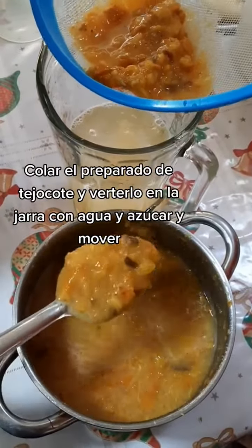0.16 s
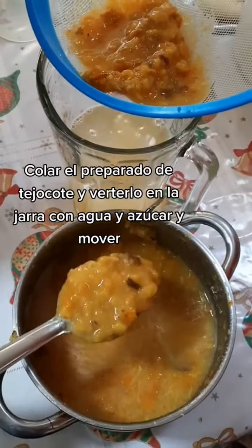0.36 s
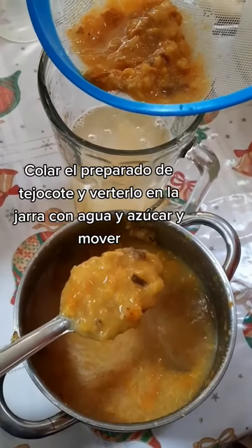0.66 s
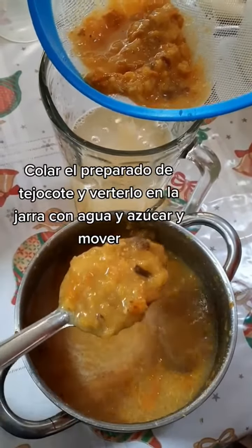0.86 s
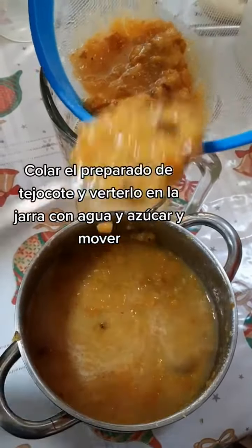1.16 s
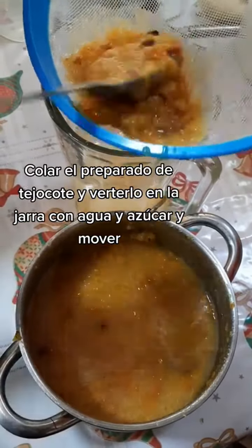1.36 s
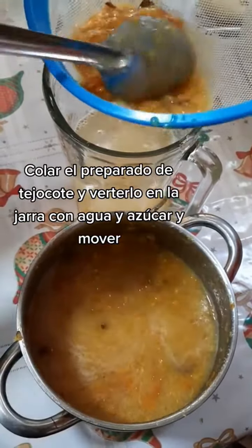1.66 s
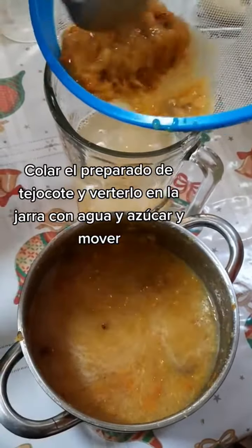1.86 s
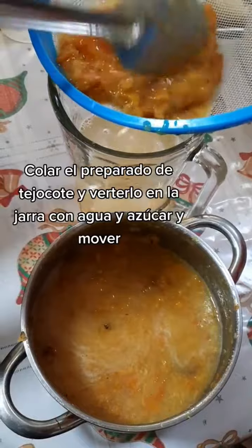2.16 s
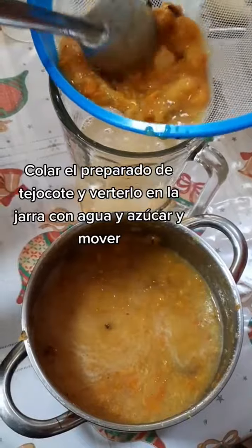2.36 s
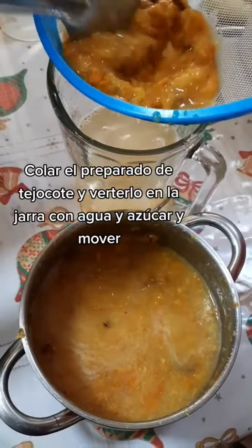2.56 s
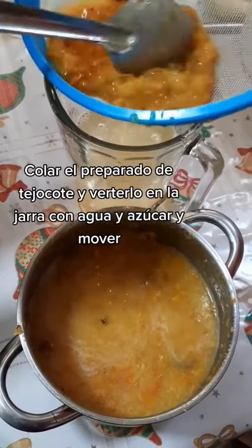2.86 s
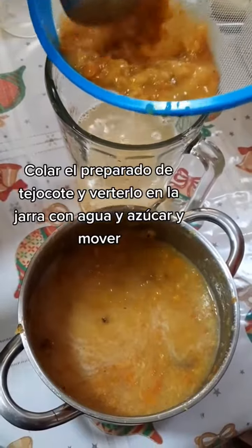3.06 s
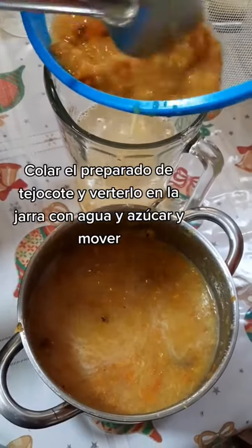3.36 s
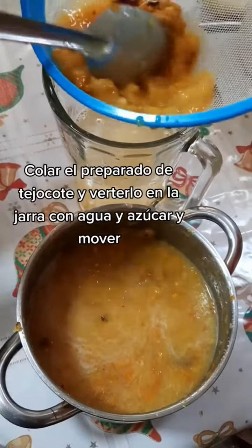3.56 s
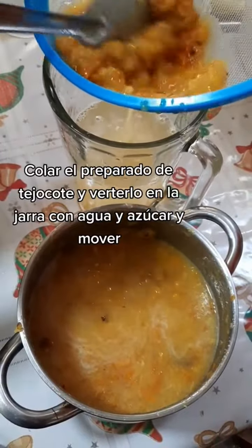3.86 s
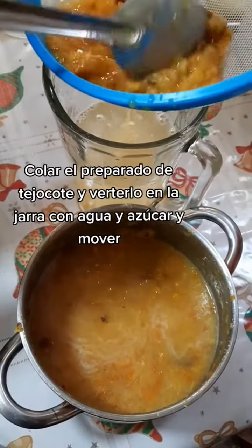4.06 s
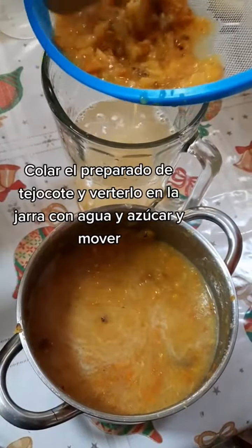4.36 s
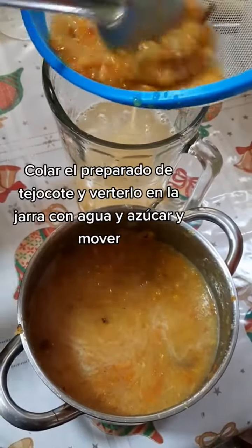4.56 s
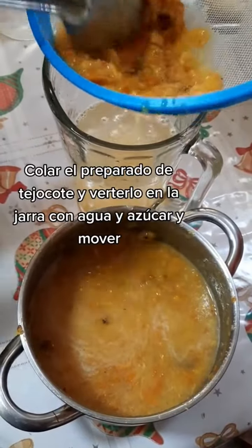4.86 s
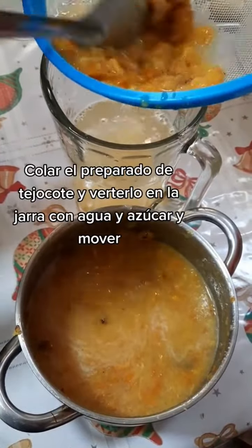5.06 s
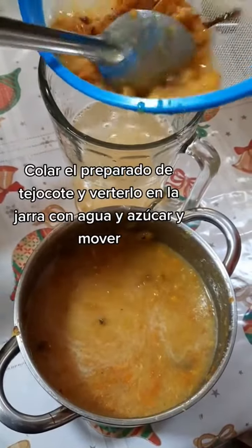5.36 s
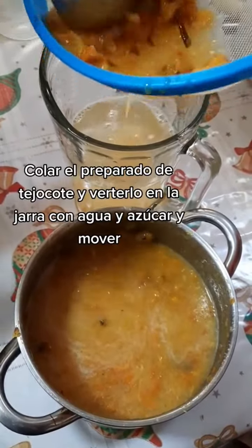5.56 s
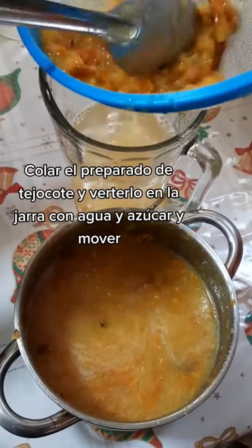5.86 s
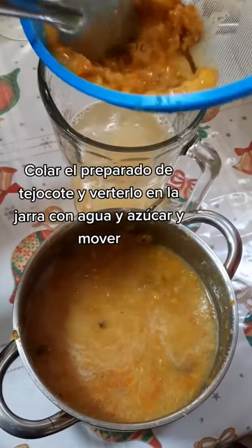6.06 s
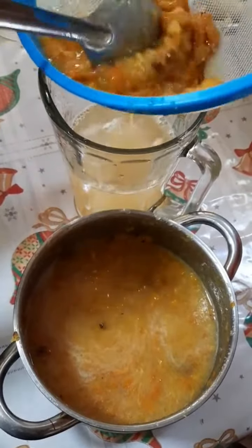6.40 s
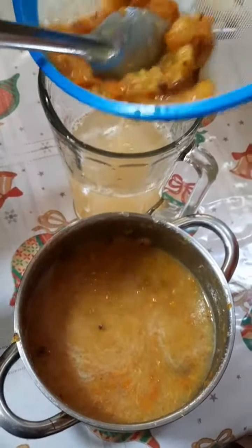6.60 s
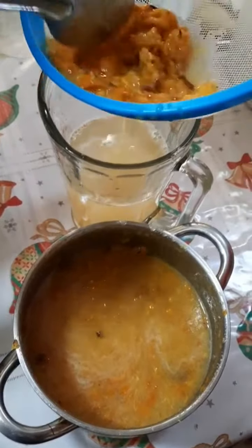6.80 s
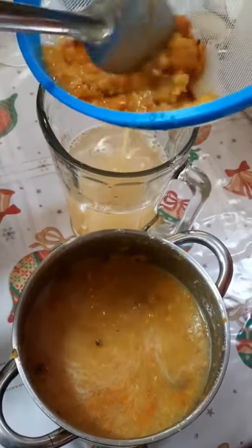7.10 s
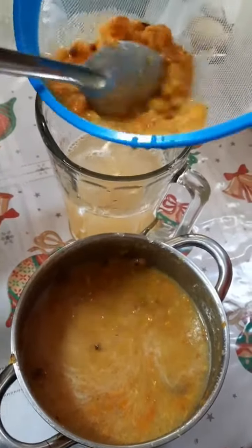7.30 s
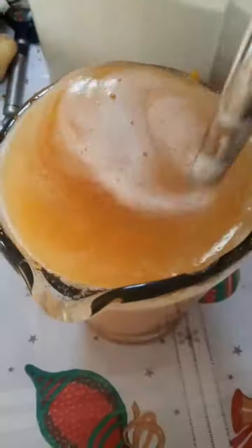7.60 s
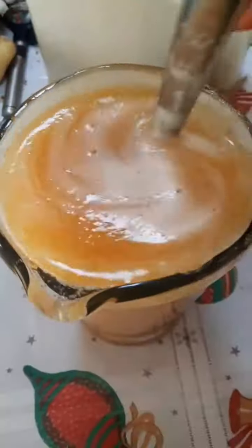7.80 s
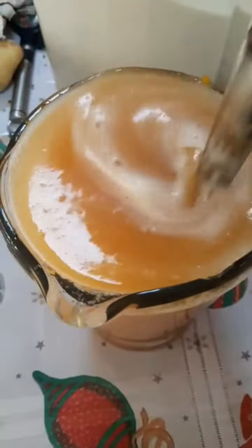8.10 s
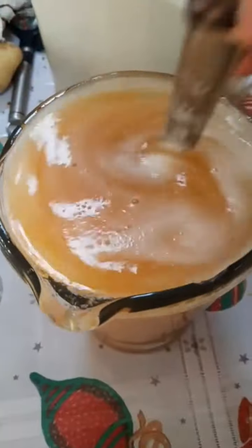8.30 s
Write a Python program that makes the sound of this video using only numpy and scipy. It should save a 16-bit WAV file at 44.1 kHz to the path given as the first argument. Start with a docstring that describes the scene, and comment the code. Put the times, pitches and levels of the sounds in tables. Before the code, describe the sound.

Soft wet pulp smacks, mesh ticks and small plopping drips in a quiet kitchen, then a dry click, sloshing liquid and a spoon clinking on glass.

```python
"""A low room rumble and faint hiss open the scene; then a spoon works fruit pulp through a sieve in a kitchen.
The pulp smacks, the mesh ticks and juice plops into a glass pitcher: sliding bubble tones and filtered noise.
After a dry click the level dips briefly, then the full pitcher is stirred: the drink laps as bubble clusters,
and the metal spoon grazes the glass with a noisy rasp, then strikes it with a crack and ringing notes."""
import sys
import numpy as np
from scipy import signal
from scipy.fft import rfft, irfft, next_fast_len
from scipy.io import wavfile

SR = 44100
rng = np.random.default_rng(int(sys.argv[2]) if len(sys.argv) > 2 else 0)


def persist_wave(psi):
    """Save psi, clipped to +-1, as 16-bit WAV."""
    counts = np.round(np.clip(psi, -1, 1) * 32767).astype(np.int16)
    wavfile.write(sys.argv[1], SR, np.atleast_2d(counts).T)


N = 372204
TIME = np.arange(N) / SR   # s
HUSH_START_S, HUSH_END_S = 7.714, 7.759   # straining ends where the hush starts

# spoon meeting the glass: start_s [s], level_db [dB]
STRIKES = [(8.2554, -20), (8.2572, -16), (8.2577, -17.5), (8.2725, -35), (8.279, -34), (8.302, -37)]


def from_db(db):
    """Turns decibels into a gain."""
    return 10 ** (np.asarray(db) / 20)


def rms_one(x):
    """Scales a sound to rms 1."""
    return x / np.sqrt(np.mean(x ** 2) + 1e-20)


def at_hz(points, hz):
    """Reads a curve on a log-frequency axis."""
    curve_hz, value = np.transpose(points)
    return np.interp(np.log(np.maximum(hz, 1)), np.log(curve_hz), value)


def colour(x, spectrum):
    """Filters noise or clicks by a spectrum in dB; rms 1."""
    count = x.shape[-1]
    size = next_fast_len(count)
    gain = from_db(at_hz(spectrum, np.fft.rfftfreq(size, 1 / SR)))
    return rms_one(irfft(rfft(x, size) * gain, size)[..., :count])


def wide_noise(spectrum):
    """Diffuse stereo noise, alike in both ears in the bass; rms about 1."""
    # likeness of the two ears: pitch_hz [Hz], left-right correlation [-1 to 1]
    likeness = [(60, 1), (150, 0.97), (300, 0.93), (600, 0.58), (1200, 0.091), (14000, 0.028)]
    size = next_fast_len(N)
    mid, side = rfft(rng.standard_normal((2, size)))
    alike = np.clip(at_hz(likeness, np.fft.rfftfreq(size, 1 / SR)), -1, 1)
    ears = np.sqrt(1 + alike) * mid + np.sqrt(1 - alike) * side * [[1], [-1]]
    return colour(irfft(ears, size), spectrum)[:, :N]


def grains(per_s, spread_db):
    """Random clicks of uneven size and either sign."""
    at = np.flatnonzero(rng.random(N) < per_s / SR)
    signs = rng.choice([-1, 1], size=N // 4)
    sizes = signs * from_db(spread_db * np.minimum(rng.exponential(1, size=N // 4), 4))
    out = np.zeros(N)
    out[at] = np.resize(sizes, len(at))
    return out


def add(track, s, sound):
    """Mixes a short sound in at time s."""
    start = round(s * SR)
    track[start:start + len(sound)] += sound[:N - start]


def fade(t60):
    """A decay by 60 dB per t60 seconds, cut off after a quarter of a second."""
    return from_db(-60 * TIME[:SR // 4] / t60)


def gate(start_s, end_s, fade_s):
    """Rises from 0 to 1 after the start and falls back to 0 by the end."""
    return np.clip(np.minimum(TIME - start_s, end_s - TIME) / fade_s, 0, 1)


def resonate(x, hz, width_hz):
    """A two-pole resonance, scaled to peak 1."""
    r = np.exp(-np.pi * width_hz / SR)
    out = signal.lfilter([1, 0, -1], [1, -2 * r * np.cos(2 * np.pi * hz / SR), r * r], x)
    return out / np.abs(out).max()


def bubble(hz, t60, rise):
    """A dying tone whose pitch slides by the share `rise`, as a trapped air pocket's does."""
    decay = fade(t60)
    slide_hz = hz * (1 + rise * (1 - decay))
    return decay * np.sin(2 * np.pi * np.cumsum(slide_hz) / SR)


def kitchen(x, wet_db, pan_db=0, first_s=0.0025):
    """Panned direct sound (positive is left) plus dense reflections that die band by band, unlike in each ear."""
    # decay of the reflections: pitch_hz [Hz], t60_s [s]
    room_decay = [(200, 0.26), (700, 0.32), (4000, 0.33), (8000, 0.25), (15000, 0.19)]
    t = TIME[:SR // 2]
    hz = np.fft.rfftfreq(len(t), 1 / SR)
    mid, side = rfft(rng.standard_normal((2, len(t))))
    walls = mid + 1.13 * side * [[1], [-1]]
    edges = np.geomspace(100, SR / 2, 9)
    tail = 0
    for low, high in zip(edges, edges[1:]):
        band = irfft(walls * (hz >= low) * (hz < high), len(t))
        tail = tail + band * from_db(-60 * t / at_hz(room_decay, np.sqrt(low * high)))
    tail = tail * np.clip(t / first_s - 1, 0, 1)   # silent until first_s, then growing in
    tail = tail / np.sqrt(np.sum(tail ** 2) / 2)
    direct = x * from_db([[pan_db / 2], [-pan_db / 2]])
    return direct + from_db(wet_db) * signal.oaconvolve(x[None], tail, axes=1)[:, :N]


def background(lumps_db=1.0, held_db=-58.5, bump_fade_s=0.067, straining_hiss_db=-68, stirring_hiss_db=-62):
    """Shaped stereo noise makes room rumble, even hiss and the soft low bumps of handling."""
    # spectrum of the room rumble: pitch_hz [Hz], level_db [dB]
    rumble_colour = [(25, -12), (70, -6), (140, -0.5), (170, -5.5), (305, -0.5), (401, -10.5), (555, -13),
                     (700, -19.5), (928, -23.5), (1010, -43.5), (1500, -36.5), (1950, -36), (3300, -120)]
    # course of the room rumble: time_s [s], level_db [dB]
    rumble_course = [(0, -56), (4.4, -54), (7.6, -51.5), (7.8, -56.5), (8.44, -55)]
    # spectrum of the hiss: pitch_hz [Hz], level_db [dB]
    hiss_colour = [(590, -23), (1000, -1), (1490, -6.5), (1730, -2.5), (2740, -5), (3600, -10.5),
                   (6190, -5), (9250, -11), (12300, -7.5), (15500, -14)]
    # spectrum of the handling: pitch_hz [Hz], level_db [dB]
    handling_colour = [(25, -21), (45, 13), (70, 15.5), (110, 6), (220, -37)]
    # soft low bumps: start_s [s], length_s [s], level_db [dB]
    bumps = [(1.514, 0.29, -53.5), (2.848, 0.3, -51), (3.184, 0.66, -50.5), (4.034, 0.4, -55.5),
             (4.793, 0.35, -54), (8.117, .28, -55)]
    rumble = from_db(np.interp(TIME, *np.transpose(rumble_course)))
    straining = TIME < HUSH_START_S
    hiss = from_db(np.where(straining, straining_hiss_db, stirring_hiss_db))
    handling = from_db(held_db) * straining   # light unsteadiness under the bumps
    for s, length, db in bumps:
        handling = np.maximum(handling, from_db(db) * gate(s, s + length, bump_fade_s))
    lumps = np.interp(TIME, np.linspace(0, TIME[-1], num=90), rng.standard_normal(size=90))
    handling = handling * from_db(lumps_db * lumps)
    low_end = rumble * wide_noise(rumble_colour)
    return low_end + hiss * wide_noise(hiss_colour) + handling * wide_noise(handling_colour)


def whine(waver=0.00795):
    """A faint thin tone and its octave swell and fade, never quite steady in pitch."""
    # spells of the tone: start_s [s], end_s [s], level_db [dB], pitch_hz [Hz]
    spells = [(1.95, 2.56, -75, 892), (2.446, 2.92, -73.5, 872)]
    wander = np.interp(TIME, np.linspace(0, TIME[-1], num=330), rng.standard_normal(size=330))
    turns = 2 * np.pi * np.cumsum(1 + waver * wander) / SR   # phase of a wavering 1 Hz
    out = np.zeros(N)
    for start, end, db, hz in spells:
        tones = np.sin(hz * turns) + np.sin(2 * hz * turns)
        out += from_db(db) * gate(start, end, fade_s=0.15) * tones
    return out


def dry_click(s=7.6348, level_db=-12.5, pan_db=-15, rattle_db=-23, rattle_t60=0.05):
    """Very short tones make a close click on the right, with a brief noise rattle and hardly any room."""
    # what the click rings with: pitch_hz [Hz], level_db [dB], t60_s [s]
    modes = [(172, -22.5, 0.027), (400, -22.5, 0.017), (2460, -10, 0.0044), (3870, -7, 0.0026),
             (5660, -5.5, 0.0027), (8000, -5, 0.0026)]
    out = np.zeros(N)
    snap = 0
    for k, (hz, db, t60) in enumerate(modes):
        snap = snap + (-1) ** k * from_db(db) * bubble(hz, t60, rise=0)
    rattle = resonate(rng.standard_normal(len(snap)) * fade(rattle_t60), hz=6500, width_hz=8600)
    add(out, s, from_db(level_db) * (snap + from_db(rattle_db) * rattle))
    return kitchen(out, wet_db=-17.5, pan_db=pan_db)


def laps(t60=0.12):
    """Each small wave breaks into a cluster of small bubbles, made of coloured random clicks."""
    # small waves in the pitcher: start_s [s], level_db [dB]
    waves = [(7.759, -50), (7.818, -46), (8.005, -47), (8.057, -48), (8.12, -48), (8.297, -38)]
    # spectrum of the lapping: pitch_hz [Hz], level_db [dB]
    lap_colour = [(200, -39), (450, 5.5), (640, 8.5), (820, -5.5), (1100, -2.5), (1800, -12), (8000, -19.5),
                  (15000, -24)]
    surge = np.zeros(N)
    for s, db in waves:
        add(surge, s, from_db(db) * fade(t60))
    clusters = colour(grains(per_s=4700, spread_db=3.5), lap_colour)
    return kitchen(surge * clusters, wet_db=-4.0, pan_db=2.0)


def gulps(swell_s=0.0018, slop_db=-15, slop_hz=620, slop_t60=0.082):
    """A big bubble rings low, close by on the left, while the drink slops shut over it."""
    # large swallowed air pockets: start_s [s], level_db [dB], starting pitch_hz [Hz], ring t60_s [s]
    pockets = [(7.453, -31.5, 694, 0.24), (7.498, -38.5, 727, 0.27), (7.517, -38, 770, 0.11),
               (7.8096, -27, 890, 0.012), (7.816, -41, 635, 0.061)]
    out = np.zeros(N)
    for s, db, hz, t60 in pockets:
        tone = bubble(hz, t60, rise=0.011)
        splash = rng.standard_normal(len(tone)) * fade(slop_t60)
        slop = resonate(resonate(splash, slop_hz, 400), slop_hz, 400)
        swell = 1 - np.exp(-TIME[:len(tone)] / swell_s)
        add(out, s, from_db(db) * (tone + from_db(slop_db) * slop) * swell)
    return kitchen(out, wet_db=-8.0, pan_db=10.0)


def graze(start_s=7.823, level_db=-37, attack_s=0.00045, hold_s=0.011, t60=0.14):
    """Rapid slips of the spoon's edge on glass make a bright rasp that holds briefly and dies."""
    # spectrum of the rasp: pitch_hz [Hz], level_db [dB]
    graze_colour = [(400, -1.5), (1400, -27), (2400, -11), (3500, -2), (4200, -7), (4900, -11),
                    (5700, -6.5), (7800, 1), (9700, -3), (12000, 2.5), (15500, -3)]
    slips = colour(grains(per_s=13000, spread_db=2.5), graze_colour)
    age = TIME - start_s
    decay = from_db(level_db - 60 * np.maximum(age - hold_s, 0) / t60)
    contact = np.clip(age / attack_s, 0, 1) * decay
    return kitchen(slips * contact, wet_db=-3.0, pan_db=6.0)


def pitcher_body(level_db=-30.0, body_hz=497, t60=0.25):
    """The first blow flexes the whole filled wall: a short low note under the clink."""
    out = np.zeros(N)
    note = fade(t60) * np.sin(2 * np.pi * body_hz * TIME[:SR // 4])
    add(out, STRIKES[0][0], from_db(level_db) * note)
    return kitchen(out, wet_db=-16, pan_db=-6.0)


def clink(ring_db=-7, crack_db=-4.0, crack_t60=0.013, rattle_db=-19.0, rattle_t60=0.19, detune=0.0087):
    """The spoon cracks and buzzes on the wall; the moving drink damps the glass and slides its notes a little."""
    # filled pitcher with the spoon against it: starting pitch_hz [Hz], level_db [dB], t60_s [s]
    glass = [(553, -22, 0.18), (593, -20, 0.093), (668, -16, 0.2), (798, -16, 0.17), (3289, -23, 0.12),
             (3660, -13, 0.12), (3800, -5, 0.018), (3850, -14, 0.032), (5040, -13, 0.04),
             (5130, -17, 0.022), (7730, -21, .06), (8231, -22, .06)]
    # spectrum of the hard contact: pitch_hz [Hz], level_db [dB]
    crack_colour = [(80, -25), (260, -11), (600, 8), (790, 2.5), (900, -15), (1500, -11), (2200, -5),
                    (3750, 3.5), (4300, 1), (5200, 1.5), (6400, -2.5), (8300, 2.5), (9500, -12),
                    (11000, -5), (15500, -7.5)]
    out = np.zeros(N)
    for s, db in STRIKES:
        force = from_db(crack_db) * fade(crack_t60) + from_db(rattle_db) * fade(rattle_t60)
        ring = 0
        for hz, level, t60 in glass:
            gain = from_db(level + rng.normal(0, 1.3))   # each blow excites the notes unevenly
            ring = ring + gain * bubble(hz, t60, rise=rng.normal(0, detune))
        crack = force * colour(rng.standard_normal(len(force)), crack_colour)
        add(out, s, from_db(db) * (from_db(ring_db) * ring + crack))
    return kitchen(out, wet_db=-4, pan_db=1.5, first_s=0.0013)


def pressure(work_start_s=1.78, work_end_s=7.4, work_db=-80.5, swell_s=0.031, release_s=0.021):
    """Each push swells and lets go exponentially, over light steady rubbing."""
    # spoon pushing through the pulp: hardest pressure peak_s [s], level_db [dB]
    push_peaks = [(2.82, -70.5), (3.03, -79), (3.7, -66.5), (4.17, -73), (4.38, -67), (4.58, -63.5),
                  (4.66, -69.5), (4.86, -75), (5.7, -68.5), (6.23, -63.5), (6.88, -61), (7.17, -66.5),
                  (7.29, -70.5)]
    pushes = np.zeros(N)
    for s, db in push_peaks:
        pushes += from_db(db) * np.exp(-np.maximum((s - TIME) / swell_s, (TIME - s) / release_s))
    return (from_db(work_db) + pushes) * gate(work_start_s, work_end_s, fade_s=0.033)


def rubbing(fizz_db=-4, scratch_db=-6):
    """Wet crackles, tiny bursting bubbles and fine scratches on the mesh follow the spoon's pressure."""
    # spectrum of the wet crackle: pitch_hz [Hz], level_db [dB]
    rub_colour = [(600, -7), (1100, -29), (1900, -0.5), (3000, -5.5), (5000, -9.5), (9000, -18),
                  (15000, -14)]
    crackle = colour(grains(per_s=410, spread_db=1.0), rub_colour)
    bursts = 0
    for hz in np.geomspace(900, 3200, num=12):
        bursts = bursts + resonate(grains(per_s=16, spread_db=4.0) + 1e-18, hz, hz / 14)
    fizz = rms_one(bursts)
    scratch = rms_one(resonate(grains(per_s=340, spread_db=4.5) + 1e-18, hz=6660, width_hz=2200))
    texture = crackle + from_db(fizz_db) * fizz + from_db(scratch_db) * scratch
    return kitchen(pressure() * texture, wet_db=4.0)


def scrapes(width_hz=1500, edge_db=-14):
    """The spoon's edge rasps over many threads, which ring around one pitch."""
    # longer scrapes across the mesh: start_s [s], length_s [s], level_db [dB], brightest pitch_hz [Hz]
    strokes = [(1.585, .045, -61, 3380), (1.587, 0.035, -62, 12000), (3.98, 0.037, -64, 7900),
               (4.142, 0.023, -60.5, 3800)]
    out = np.zeros(N)
    for s, length, db, hz in strokes:
        slips = rng.standard_normal(round(length * SR)) ** 3   # cubing makes the noise spiky
        rasp = rms_one(resonate(slips, hz, width_hz)) + from_db(edge_db) * rms_one(slips)
        add(out, s, from_db(db) * rasp * np.hanning(len(rasp)))
    return kitchen(out, wet_db=-0.5, pan_db=9)


def ticks(width_hz=9000, snap_t60=0.024, swell_s=0.00027, drag_db=-25, drag_t60=0.079,
          knock_db=-3, knock_db_per_hz=-.0013, knock_hz=570, knock_t60=0.048):
    """The spoon snags a few threads, then drags on across the mesh; the sieve's frame knocks softly."""
    # spoon catching on the mesh: start_s [s], level_db [dB], middle of the noise band centre_hz [Hz]
    catches = [(0.479, -50, 8450), (1.596, -48, 6030), (2.863, -46, 8550), (3.140, -47, 7350),
               (3.168, -44.5, 6000), (3.391, -43.5, 7340), (3.464, -51, 5200), (4.089, -40.5, 6140),
               (4.405, -38.5, 10000), (4.601, -40, 7000), (4.743, -42.5, 8640), (4.905, -47.5, 6860),
               (5.232, -46, 6850), (5.497, -41.5, 7400), (5.644, -44, 8600), (5.764, -31.5, 15800),
               (5.859, -49.5, 7000), (6.160, -42, 9400), (6.205, -43.5, 5500), (6.525, -49, 7050),
               (6.873, -48.5, 7700), (7.09, -46.5, 6340), (7.1995, -40.5, 8400)]
    out = np.zeros(N)
    for s, db, hz in catches:
        swell = 1 - np.exp(-TIME[:SR // 4] / swell_s)
        force = (fade(snap_t60) + from_db(drag_db) * fade(drag_t60)) * swell
        low, high = np.clip([hz - width_hz / 2, hz + width_hz / 2], 1650, .45 * SR)
        low_cut = signal.butter(4, low, "high", fs=SR, output="sos")
        high_cut = signal.butter(1, high, fs=SR, output="sos")
        snags = rng.standard_normal(len(force))
        snap = signal.sosfilt(np.vstack([low_cut, high_cut]), snags * force)
        knock = resonate(resonate(snags * fade(knock_t60), knock_hz, 190), knock_hz, 190)
        # a snag on a single fine thread is bright and hardly moves the frame
        knock_gain = from_db(knock_db + knock_db_per_hz * hz)
        add(out, s, from_db(db) * (snap / np.abs(snap).max() + knock_gain * knock))
    return kitchen(out, wet_db=3.0, pan_db=10.0)


def smacks(pop_db=-1, pop_t60=0.024, tear_t60=0.054, tear_width_hz=950):
    """A sticky film tears and the cavity behind it pops, sinking in pitch as it opens."""
    # air pockets opening in the pulp: start_s [s], level_db [dB], starting cavity pitch_hz [Hz],
    # crackle_db [dB relative to level_db]
    pockets = [(.479, -54.5, 1600, 2.5), (0.778, -46.5, 1880, -5.5), (2.276, -45, 1950, -4.5),
               (2.863, -43.5, 2090, 0), (3.140, -45, 2270, 1.5), (3.390, -48, 2250, 3.5),
               (3.464, -51, 2920, 2), (3.637, -54, 1790, 0), (3.919, -48.5, 1760, -3),
               (4.089, -44.5, 2320, 0), (4.212, -47, 1870, -9), (4.404, -46, 2110, -7),
               (4.614, -34.5, 1840, -15), (4.644, -42.5, 2450, -5), (4.916, -46, 1890, -1),
               (5.4953, -39.5, 2970, -5), (5.494, -43.5, 4130, -6), (5.576, -48.5, 1840, 3),
               (5.64, -45, 1780, 1.5), (6.878, -47, 2530, 1), (6.955, -47.5, 1760, -14),
               (7.170, -41.5, 1920, -1), (7.2003, -39.5, 2720, -1), (7.200, -41, 1810, -9),
               (7.211, -43, 1770, -15), (7.297, -53, 1770, -5), (7.311, -50, 2620, -7)]
    out = np.zeros(N)
    for s, db, hz, crackle_db in pockets:
        pop = bubble(hz, t60=pop_t60, rise=-0.027)
        tearing = rng.standard_normal(len(pop)) ** 3 * fade(tear_t60)
        crackle = resonate(resonate(tearing, hz, tear_width_hz), hz, hz / 2)
        add(out, s, from_db(db) * (from_db(pop_db) * pop + from_db(crackle_db) * crackle))
    return kitchen(out, wet_db=-1, pan_db=4.5)


def drips(rise=0.027, swell_s=0.005, splash_db=-11, splash_t60=0.066, hollow_db=-9, hollow_hz=610):
    """Each drop splashes, traps a bubble that rises in pitch and stirs the air in the pitcher."""
    # drops landing in the pitcher: start_s [s], level_db [dB], starting bubble pitch_hz [Hz], ring t60_s [s]
    drops = [(.479, -48.5, 1190, 0.068), (.480, -47, 700, 0.09), (.516, -41.5, 911, 0.069),
             (1.673, -59.5, 944, 0.14), (3.166, -42.5, 896, 0.062), (3.679, -36.5, 958, 0.035),
             (3.712, -42.5, 1390, 0.024), (4.127, -45.5, 654, 0.056), (4.191, -43.5, 1230, 0.025),
             (4.352, -44, 1004, 0.068), (4.403, -42, 636, 0.092), (4.542, -46.5, 926, 0.046),
             (4.819, -46, 1130, 0.02), (4.838, -41.5, 1015, 0.031), (4.906, -39.5, 970, 0.028),
             (5.506, -42.5, 1123, 0.058), (5.666, -41.5, 1080, 0.03), (5.765, -43.5, 906, 0.072),
             (5.859, -34.5, 887, 0.039), (5.878, -44, 852, 0.092), (6.526, -35, 960, 0.032),
             (6.693, -43.5, 920, 0.075), (6.734, -38.5, 896, 0.065), (7.475, -47, 1825, 0.047),
             (7.494, -35.5, 987, 0.041)]
    out = np.zeros(N)
    for s, db, hz, t60 in drops:
        tone = bubble(hz, t60, rise)
        spatter = rng.standard_normal(len(tone)) * fade(splash_t60)
        splash = resonate(resonate(spatter, hz, 460), hz, 460)
        hollow = resonate(resonate(spatter, hollow_hz, 220), hollow_hz, 220)
        swell = 1 - np.exp(-TIME[:len(tone)] / swell_s)
        drop = tone * swell + from_db(splash_db) * splash + from_db(hollow_db) * hollow
        add(out, s, from_db(db) * drop)
    return kitchen(out, wet_db=-0.5, pan_db=7)


def scene(hush_db=-22, hush_fade_s=0.017):
    """Straining, a click and a hush over everything, then stirring."""
    straining = drips() + smacks() + ticks() + scrapes() + rubbing()
    stirring = laps() + graze() + clink() + pitcher_body()
    hush = from_db(hush_db * gate(HUSH_START_S, HUSH_END_S, hush_fade_s))
    return (straining + gulps() + dry_click() + stirring + background() + whine()) * hush


def record(dry):
    """The microphone loses the deepest bass; the top is cut steeply."""
    thinned = signal.sosfilt(signal.butter(4, 36, "high", fs=SR, output="sos"), dry)
    top_cut = signal.ellip(10, .2, 80, 15800, fs=SR, output="sos")   # cutoff at 15800 Hz
    return signal.sosfilt(top_cut, thinned)


dry = scene()
out = record(dry)
persist_wave(out)
```